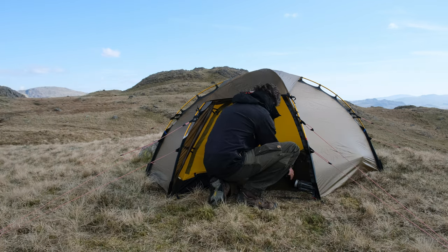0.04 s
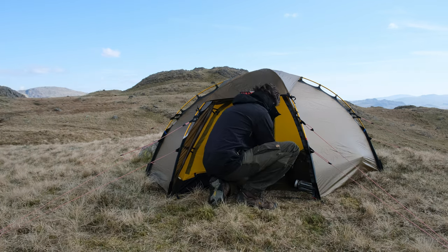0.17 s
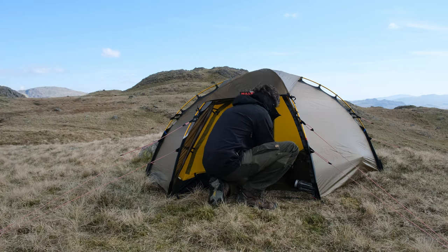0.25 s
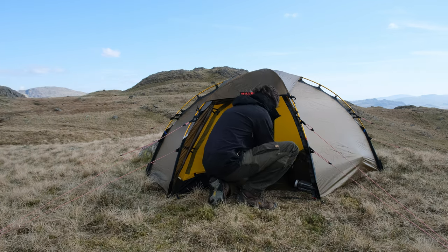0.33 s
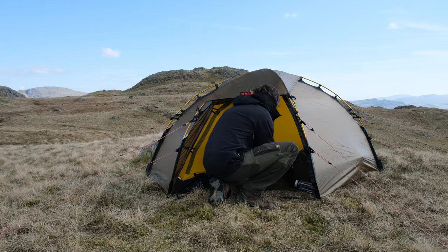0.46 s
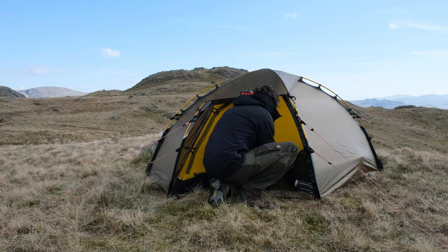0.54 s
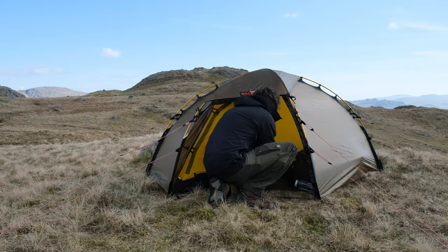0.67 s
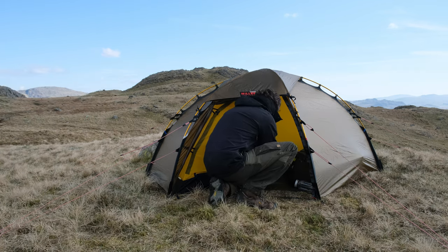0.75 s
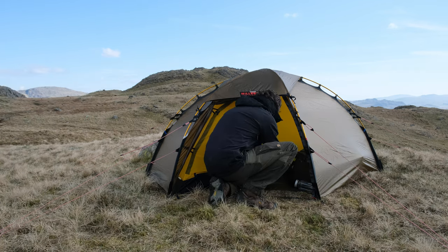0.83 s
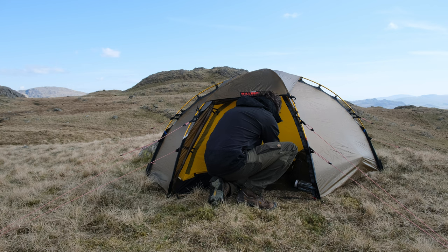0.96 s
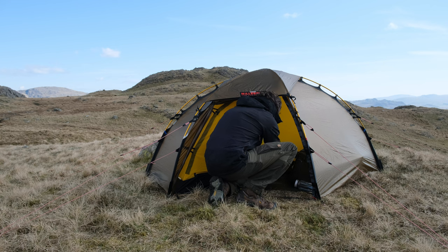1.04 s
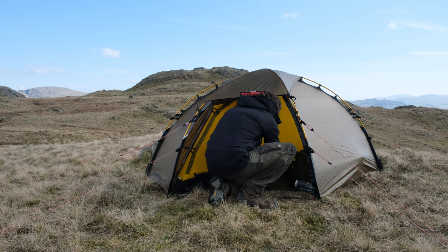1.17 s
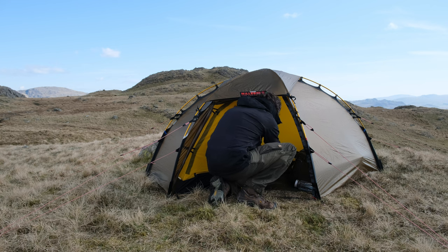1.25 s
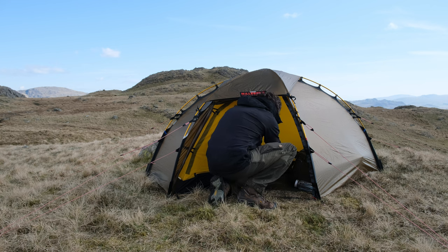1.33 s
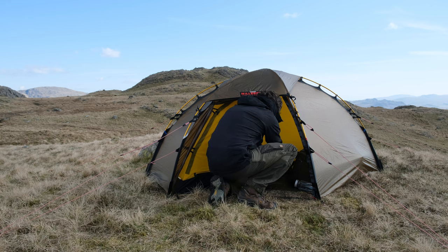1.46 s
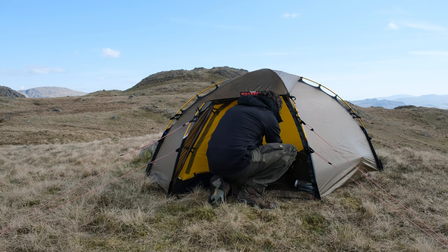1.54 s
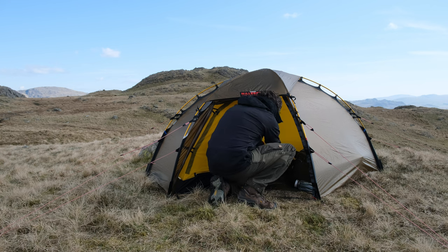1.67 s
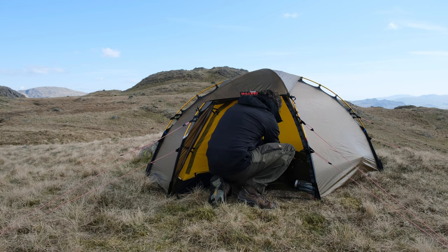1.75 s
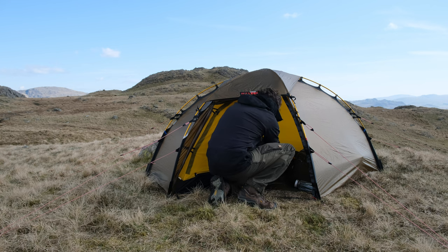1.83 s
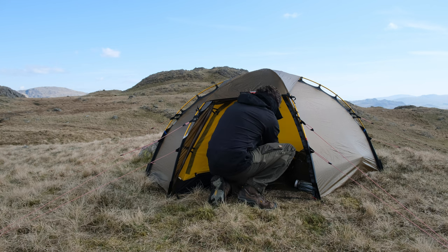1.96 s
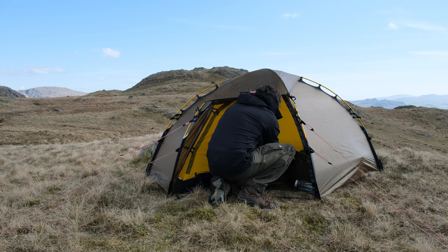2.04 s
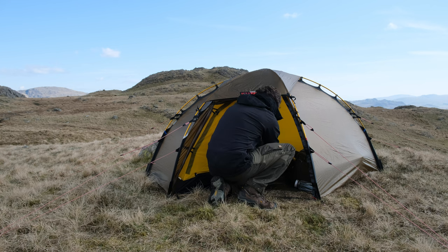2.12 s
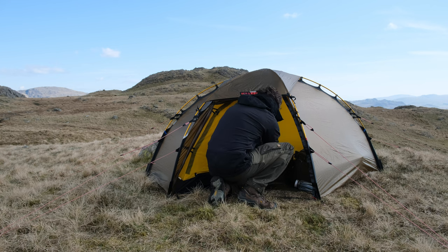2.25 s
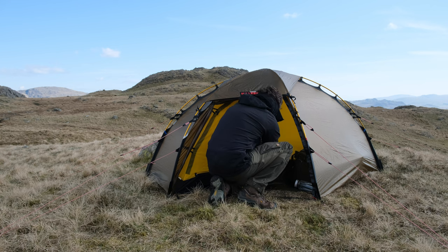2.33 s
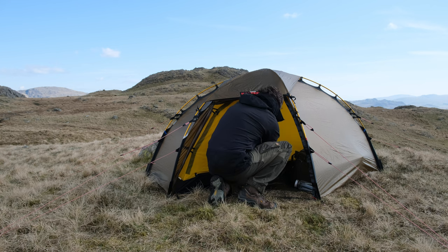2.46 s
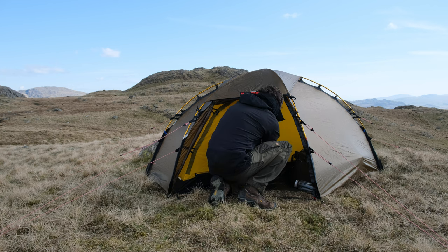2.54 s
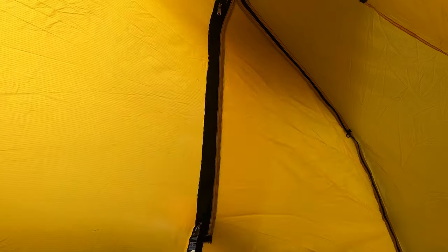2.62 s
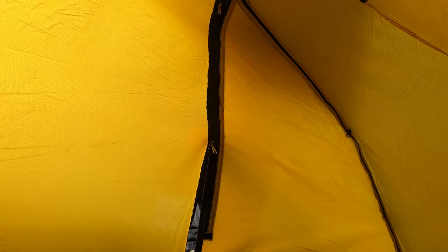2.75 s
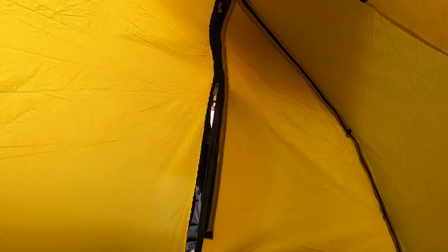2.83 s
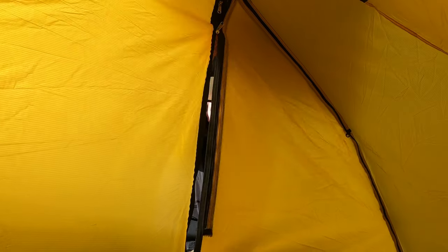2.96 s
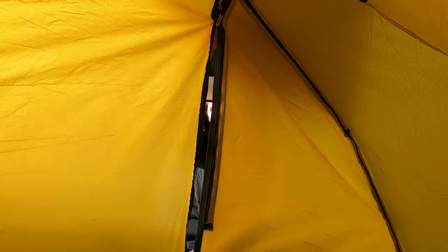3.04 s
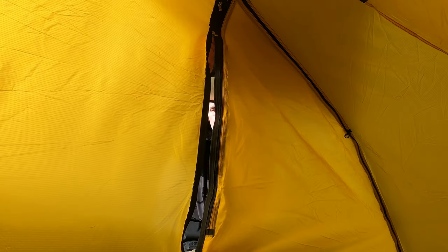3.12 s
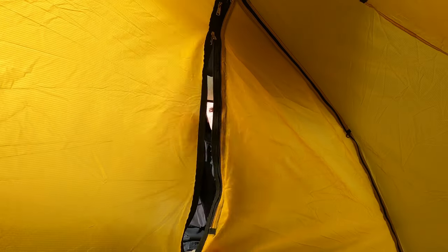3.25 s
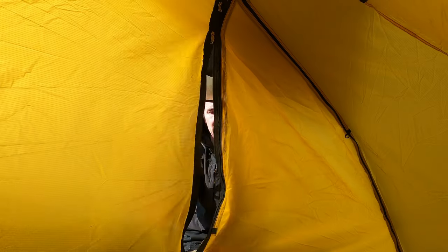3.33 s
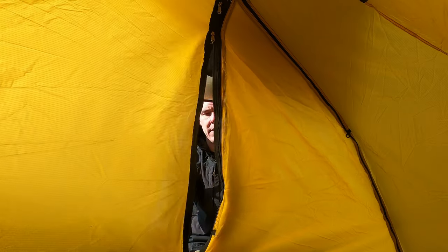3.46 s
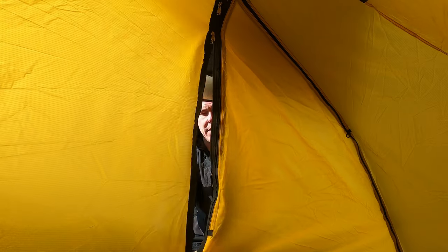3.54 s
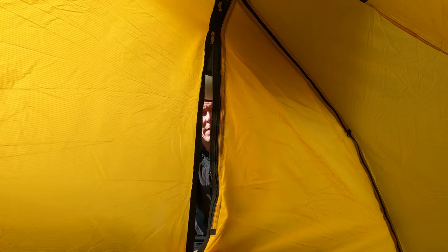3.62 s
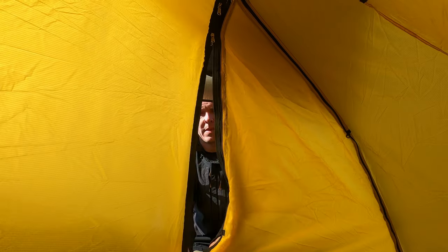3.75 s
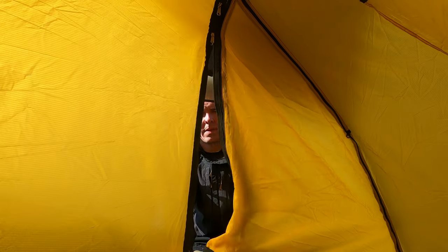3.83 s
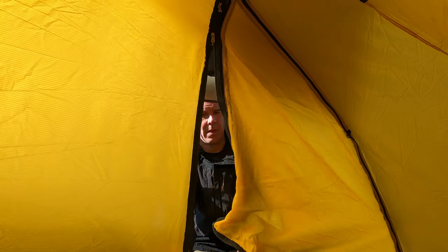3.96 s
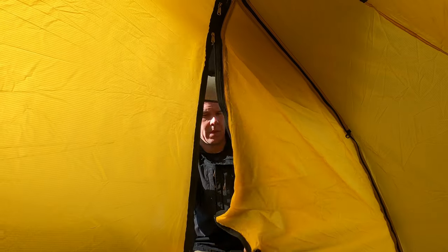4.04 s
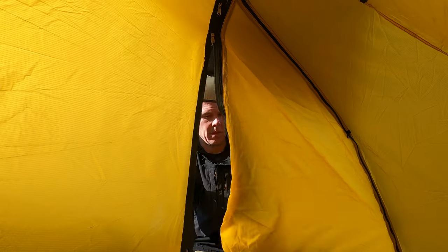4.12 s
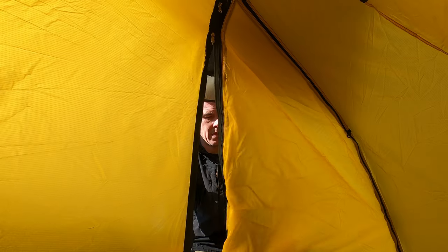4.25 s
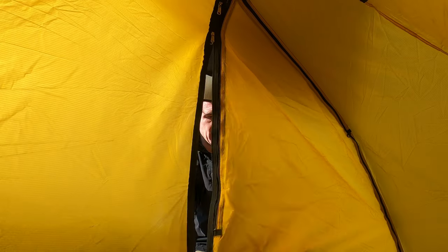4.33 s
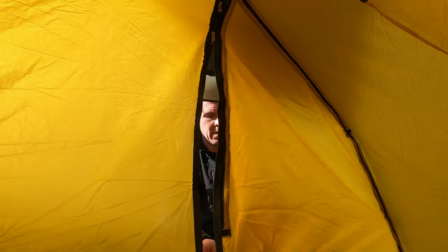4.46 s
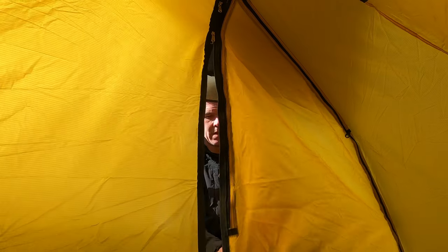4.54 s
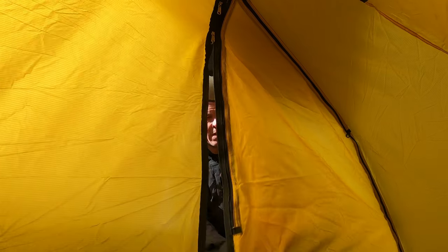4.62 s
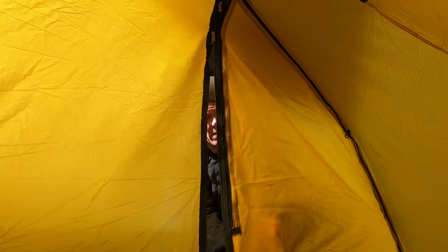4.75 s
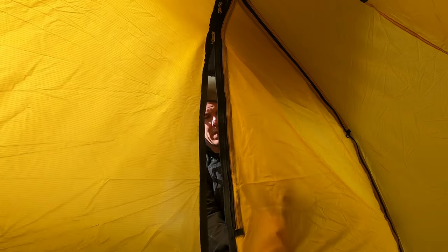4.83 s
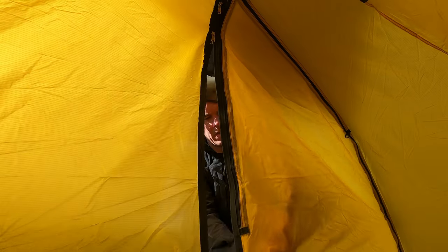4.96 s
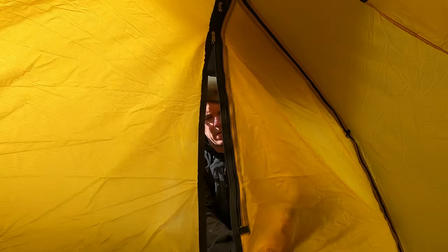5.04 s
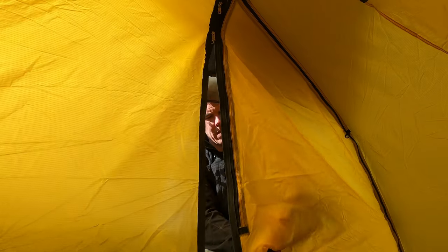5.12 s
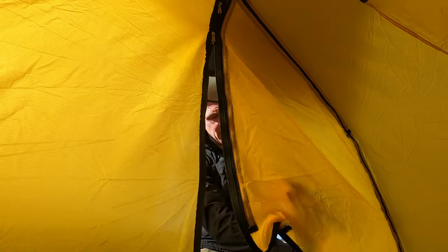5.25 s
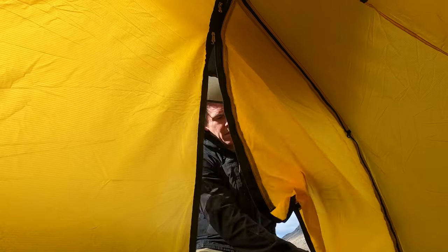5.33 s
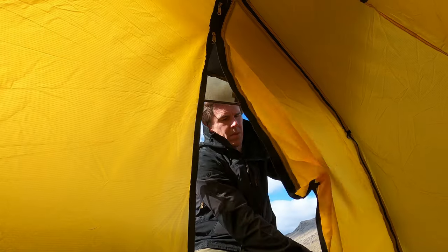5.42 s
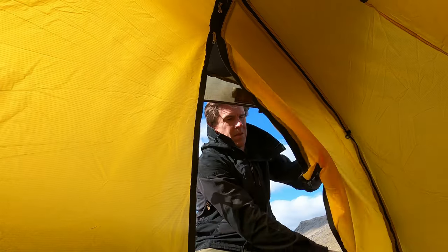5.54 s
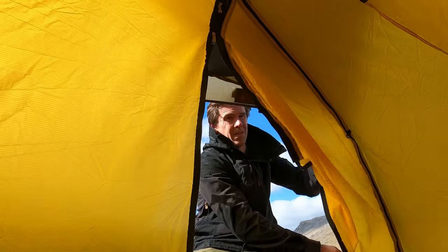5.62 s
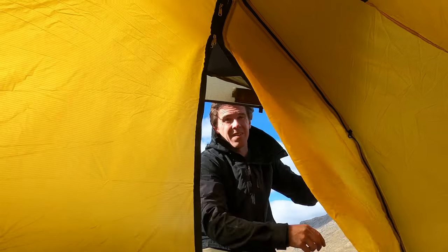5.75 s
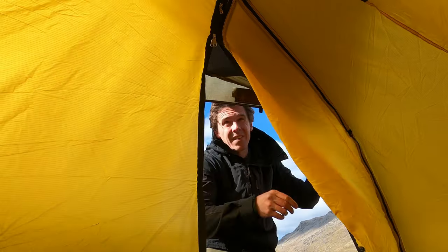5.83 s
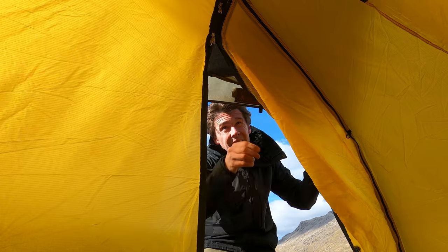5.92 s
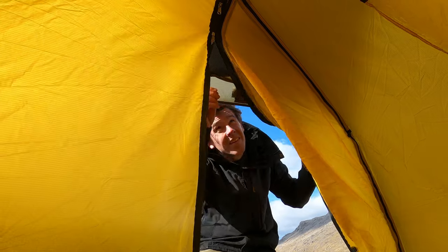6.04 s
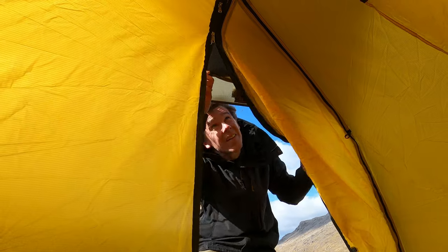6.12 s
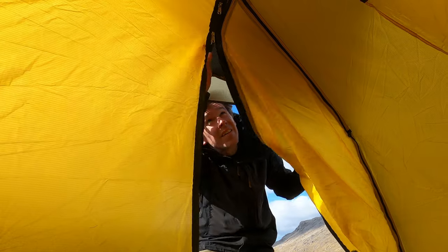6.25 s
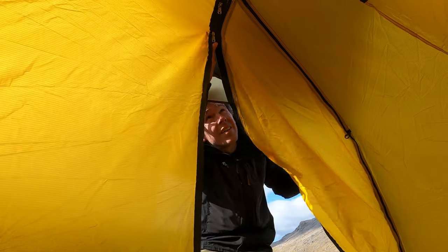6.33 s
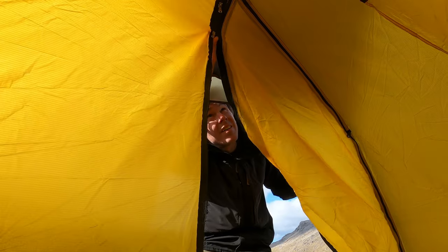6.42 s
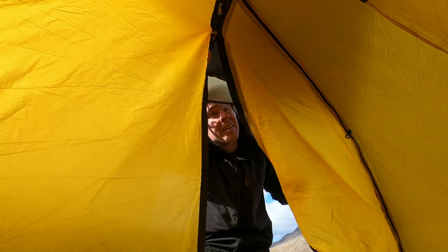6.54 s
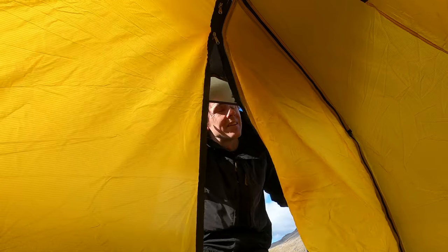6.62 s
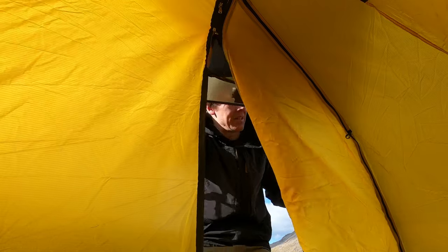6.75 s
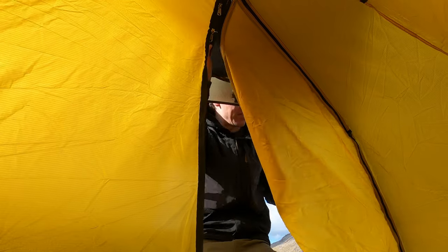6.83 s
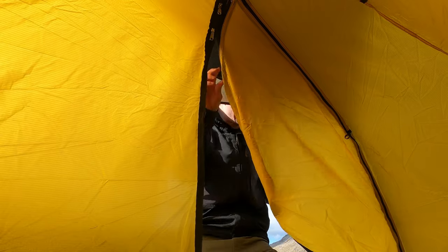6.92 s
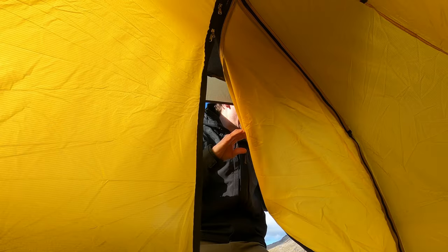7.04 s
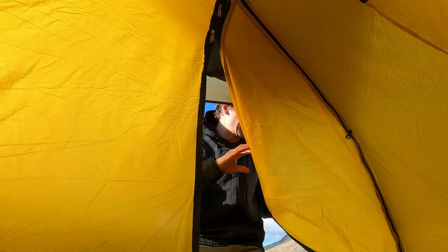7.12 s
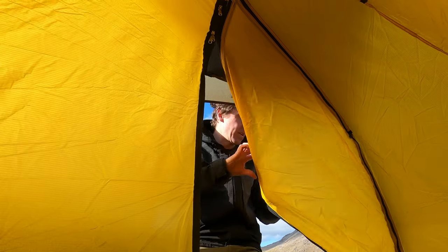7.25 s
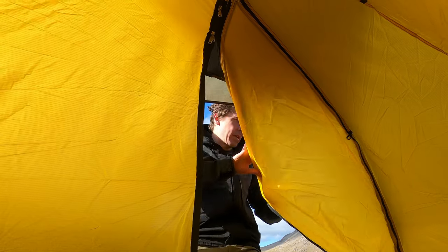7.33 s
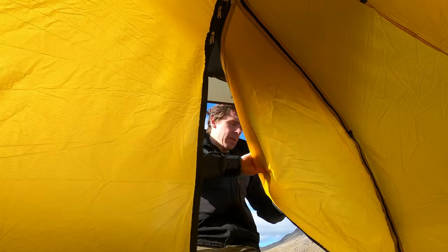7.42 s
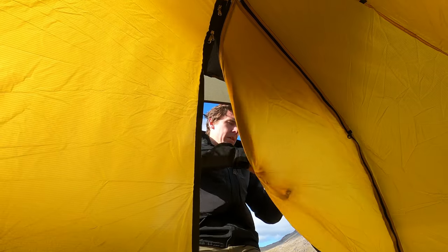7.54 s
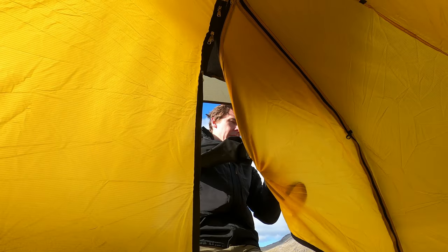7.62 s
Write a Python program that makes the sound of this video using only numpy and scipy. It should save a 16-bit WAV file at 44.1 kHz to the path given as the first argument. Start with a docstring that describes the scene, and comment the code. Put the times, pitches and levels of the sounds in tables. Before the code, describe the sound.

From 0 to 2.5 s, a light breeze buffets the microphone on an open hillside, with thin grass hiss, soft nylon rubbing, sparse dry crackles underfoot and faint tab jingles and creases ticking. Around 2.5 s a zipper slider nudges, then sweeps quickly until 3.1 s, its buzz climbing bright and slowing; the sound moves inside the tent. Tabs jingle and cloth rubs. From 3.75 to 4.1 s a lower, coarser zip growls, ending in a loud fabric snap, low flap and metallic jingle near 4.15 s. Crinkles and ticks continue until a third fast rasp from 5.05 to 5.6 s, rising early then dropping. Cloth swishes and folds afterward; a short, weak, slow tug comes at 6.7 s, with a soft panel thump near 6.9 s. Rustling nylon and gentle wind remain to the end, close and slightly right, with tiny bright wall echoes.

```python
"""Light wind and rubbing nylon open on a hillside; boots crackle in dry grass, pull tabs jingle, creases tick.
At 2.5 s a nudge of the zip slider leads into a quick sweep, and the sound passes to inside the tent.
Two more sweeps and, at 6.7 s, a short tug follow; tooth rate sets the pitch, taut cloth brightens the rasp.
Between sweeps cloth rubs, snaps, flaps and folds; random echoes from the tent walls scatter the treble."""
import sys
import numpy as np
from scipy import signal
from scipy.fft import rfft, irfft
from scipy.io import wavfile

SR = 44100
rng = np.random.default_rng(int(sys.argv[2]) if len(sys.argv) > 2 else 0)


def put_to_file(sound):
    """Save the sound as 16-bit audio at rate SR, in the file named by the first command-line argument."""
    columns = np.atleast_2d(sound).T  # one column per channel
    safe = np.clip(columns, -1, 1)
    whole_steps = np.round(safe * 32767)
    wavfile.write(sys.argv[1], SR, whole_steps.astype(np.int16))


N = 338688
T = np.arange(N) / SR
FREQ = np.maximum(np.arange(N // 2 + 1) * SR / N, 1)
TOP_HZ = 15050
# 0 on the hillside, 1 inside the tent
INSIDE = np.clip((T - 2.55) / .1, 0, 1)


def undb(db):
    """Decibels to amplitude ratio."""
    return 10 ** (np.asarray(db) / 20)


def noise():
    """White noise at unit level."""
    return rng.standard_normal(N)


def unit(x):
    """Scale to an rms of 1."""
    return x / np.sqrt(np.mean(x ** 2))


def walk(rate_hz):
    """Smooth random motion with a spread near 1."""
    return unit(irfft(rfft(noise()) / (1 + (FREQ / rate_hz) ** 2), N))


def curves(table):
    """A table's columns at every sample."""
    s, *columns = np.transpose(table)
    return [np.interp(T, s, c) for c in columns]


def during(table, fade_s=.012):
    """1 over the table's span, with soft edges."""
    start_s, end_s = table[0][0], table[-1][0]
    return np.clip(np.minimum(T - start_s, end_s - T) / fade_s + 1, 0, 1)


def colour(x, points, band_hz=None):
    """Causal filter through (Hz, dB) points; unit white noise comes out at unit level within the band."""
    hz, db = np.transpose(points)
    gain = undb(np.interp(np.log(FREQ), np.log(hz), db))
    in_band = 1 if band_hz is None else (FREQ > band_hz[0]) & (FREQ < band_hz[1])
    level = np.sqrt(np.mean(gain ** 2 * in_band))
    # minimum phase by folding the cepstrum
    cepstrum = irfft(np.log(gain / level), N)
    cepstrum[1:N // 2] *= 2
    cepstrum[N // 2 + 1:] = 0
    return irfft(rfft(x) * np.exp(rfft(cepstrum)), N)


def grains(rate_per_s, spread_db):
    """Random impulses of uneven size and sign."""
    hits = rng.random(N) < rate_per_s / SR
    return hits * rng.choice([-1, 1], N) * undb(spread_db * np.clip(noise(), -2, 2))


def add(track, s, x):
    """Mix x into the track at time s."""
    i = int(s * SR)
    track[i:i + len(x)] += x[:N - i]


def band_pass(x, hz, width_hz):
    """One resonance, gain 1 at its centre."""
    return signal.lfilter(*signal.iirpeak(hz, hz / width_hz, fs=SR), x)


def gusting():
    """Relative strength of the wind in dB: bell-shaped gusts over a light breeze."""
    # gusts: (peak time [s], level [dB])
    gust_peaks = [(1.03, -44.5), (1.52, -44), (1.87, -45.5), (2.92, -42), (3.8, -40), (4.201, -45),
                  (5.88, -42.5), (7.0, -43)]
    swell_s, breeze_db = 0.12, -55
    power = undb(breeze_db) ** 2
    for s, db in gust_peaks:
        bell = np.exp(-((T - s) / swell_s) ** 2 / 2)
        power = power + (undb(db) * bell) ** 2
    return 10 * np.log10(power)


def wind(buffet_db=-8.5, hiss_db=-64, shelter_db=-6, side_db=-9):
    """Gusts buffet the microphone; the grass hisses, softer after 2.6 s, its treble rolled off above 9 kHz."""
    # buffeting spectrum: (frequency [Hz], level [dB])
    buffet_colour = [(30, 7), (100, -4), (200, -17), (500, -48)]
    # grass hiss spectrum: (frequency [Hz], level [dB])
    hiss_colour = [(200, 5), (1100, -2), (2400, -16.5), (8400, -10), (15000, -13)]
    sides = np.array([[1], [-1]])
    # the ears' buffets differ only inside
    side_buffet = undb(side_db) * INSIDE * sides * colour(noise(), buffet_colour)
    buffet = colour(noise(), buffet_colour) + side_buffet
    buffet = buffet * undb(gusting() + buffet_db + 2 * walk(34.0))
    hiss = colour(noise(), hiss_colour) + 0.07 * sides * colour(noise(), hiss_colour)
    rolled_off = signal.sosfilt(signal.butter(2, 9000, fs=SR, output="sos"), hiss)
    hiss = hiss + INSIDE * (rolled_off - hiss)
    return buffet + hiss * undb(hiss_db + shelter_db * INSIDE + walk(2.9))


def rubbing():
    """Relative level of the cloth's friction in dB: each rub has an attack, a sagging hold and a release."""
    # moves of the hand or door: (start [s], length [s], level [dB])
    rubs = [(0, 0.16, -61), (1.72, 0.16, -61), (2.27, 0.39, -60.5), (3.047, 0.13, -53), (3.164, 0.062, -47),
            (3.22, 0.35, -58), (3.584, 0.3, -53.5), (4.056, 0.034, -47.5), (4.127, 0.021, -36.5),
            (4.216, 0.038, -43.5), (4.305, 0.11, -54), (4.668, 0.3, -53), (5.554, 0.27, -50),
            (5.824, 0.59, -60), (6.247, 0.12, -51.5), (6.413, 1.3, -61), (6.655, 0.08, -51.5),
            (6.725, 0.32, -46.5), (7.046, 3, -52.5), (7.479, 0.16, -42)]
    attack_s, sag_db, release_s, resting_db = 0.036, 1, 0.042, -66
    power = undb(resting_db) ** 2
    for start_s, length_s, db in rubs:
        attack = np.clip((T - start_s) / attack_s, 0, 1)
        hold = undb(db - sag_db * np.clip((T - start_s) / length_s, 0, 1))
        release = np.exp(-np.maximum(T - start_s - length_s, 0) / release_s)
        power = power + (attack * hold * release) ** 2
    return 10 * np.log10(power)


def nylon(swish_db=-2.5, crinkle_db=-7.0, crinkle_s=0.00079, flutter_db=-26, flutter_slope=0.64, grip_db=1.16):
    """Cloth slides in uneven grips: a swish of threads, small crinkles and the flutter of the panel."""
    # spectrum of sliding threads: (frequency [Hz], level [dB])
    swish_colour = [(300, -2.5), (750, -8.5), (1300, 0), (2300, -1), (5500, -7.5), (9000, -16),
                    (15000, -34)]
    # spectrum of the fluttering panel: (frequency [Hz], level [dB])
    flutter_colour = [(60, -21.5), (150, 4), (330, -4), (1000, -34.5)]
    rub_db = rubbing()
    # each crinkle is a short crunch that dies away
    decay = np.exp(-T[:SR // 50] / crinkle_s)
    crinkles = signal.fftconvolve(np.abs(grains(220, 5.5)), decay)[:N] * noise()
    threads = undb(swish_db) * noise() + undb(crinkle_db) * unit(crinkles)
    swish = colour(threads * undb(rub_db + grip_db * walk(37)), swish_colour, (1000, 9000))
    # out on the hillside, dry grass crackles under the boots
    grass = (1 - INSIDE) * grains(12, 3) * undb(-46)
    # flutter grows more slowly than the rubbing and is heard only from inside
    flutter_level = undb(flutter_slope * rub_db + flutter_db + 2 * walk(26))
    flutter = INSIDE * colour(noise(), flutter_colour) * flutter_level
    return swish + grass + flutter


def tabs(knocks, jingle_db=-30, rattle_s=0.024, contact_db=-3):
    """Metal pull tabs chatter together, a bright scratch of contacts and their ring; slider knocks ring too."""
    # jingles: (time [s], level [dB])
    jingles = [(0.674, -49), (1.629, -48), (2.098, -50), (3.032, -32), (3.508, -38), (3.586, -36),
               (4.142, -32), (4.351, -36), (4.7027, -52), (4.813, -48), (4.8587, -42), (5.048, -43),
               (5.718, -43.5), (6.7515, -38.5)]
    # ringing modes of a tab: (frequency [Hz], level [dB], 60 dB decay time [s])
    tab_modes = [(5965, 0, .06), (8130, -8, .025), (8480, -7, .035), (10600, -13, .02), (14300, -16, .07)]
    shaking, t = np.zeros(N), T[:SR // 4]
    for s, db in jingles:
        add(shaking, s, undb(db) * np.exp(-(t / rattle_s) ** 2))
    ears = []
    for _ in range(2):
        chatter = shaking * unit(grains(2500, 3))
        ring = np.zeros(len(t))
        for hz, db, t60_s in tab_modes:
            ring += undb(db - 60 * t / t60_s) * np.sin(2 * np.pi * (hz * t + rng.random() / 2))
        ringing = signal.fftconvolve(undb(jingle_db) * chatter + knocks, ring)[:N]
        ears.append(ringing + undb(contact_db) * band_pass(chatter, 6400, 3000))
    return np.array(ears)


def ticks(crack_db=-11, crack_s=0.00025, tail_db=-24, tail_s=0.0094, split_hz=4000):
    """A crease in the nylon flips with a crack, and the cloth round it shivers."""
    # snapping creases: (time [s], level [dB], treble gain [dB])
    creases = [(1.631, -29, 4), (2.409, -25, -0.5), (2.535, -28.5, 8), (3.584, -21.5, 10.5),
               (3.642, -30, 16), (4.142, -9.5, 2), (4.496, -24, 18.5), (4.972, -23, 8), (5.815, -24.5, 7),
               (5.996, -25, 5.5), (6.233, -27, 9), (6.608, -44, 28.5)]
    # spectrum of a snap: (frequency [Hz], level [dB])
    snap_colour = [(100, 23), (700, 8), (1100, 13.5), (2500, 4), (9000, -7.5), (15000, -34)]
    low_pass = signal.butter(2, split_hz, fs=SR, output="sos")
    high_pass = signal.butter(2, split_hz, "high", fs=SR, output="sos")
    track, t = np.zeros(N), T[:SR // 12]
    envelope = undb(crack_db) * np.exp(-t / crack_s) + undb(tail_db) * np.exp(-t / tail_s)
    for s, db, treble_db in creases:
        burst = rng.standard_normal(len(t)) * envelope
        burst[0] = 1
        dull = signal.sosfilt(low_pass, burst)
        sharp = signal.sosfilt(high_pass, burst)
        # second-order halves meet in phase when subtracted
        add(track, s, undb(db) * (dull - undb(treble_db) * sharp))
    return colour(track, snap_colour)


def along(place):
    """A random property of the zip, new at every whole step of place and interpolated between."""
    values = rng.standard_normal(int(place[-1]) + 2)
    return np.interp(place, np.arange(len(values)), values)


def stroke(table, jitter, scrape_db, growl_db, tab_db, edge_hz, wobble=.014, uneven_db=1.08):
    """One pull of the slider: returns the tape's hum, tooth clicks, scrape, fabric growl and knocks on the tab."""
    # taut tape resonating under the slider: (time [s], frequency [Hz], level [dB])
    surges = [(2.765, 1900, 9.5), (2.835, 4420, 9.5), (2.918, 3360, 8.5), (5.258, 2470, 9.5),
              (5.44, 2150, 12)]
    surge_s, surge_width_hz = 0.04, 154
    smooth_hz, taut_hz = 1000, 1130  # tooth rates of a smooth pull and of a fully taut door
    bending_hz = 70  # the tape is one bending wavelength long here
    node_teeth, steady_below_hz = 12, 3000
    hz, hum_db, rasp_db = curves(table)
    gate = during(table)
    on = gate > 0
    # the slider's place in teeth; the slower it goes, the more unevenly the teeth let go
    teeth = np.cumsum((hz * (1 + wobble * walk(60)))[on]) / SR
    slow = np.sqrt(smooth_hz / hz[on])
    place = teeth + jitter * slow * along(teeth)
    force = undb(uneven_db * slow * along(teeth))

    def partial(k):
        """k times the tooth rate; it fades across the panel's nodes and surges where the tape resonates."""
        partial_hz = k * hz[on]
        steady = np.sqrt(steady_below_hz / partial_hz)
        drift = along(teeth / node_teeth) + 1j * along(teeth / node_teeth)
        fading = (steady + drift) / np.sqrt(steady ** 2 + 1)
        surge = 0
        for s, centre_hz, db in surges:
            if table[0][0] < s < table[-1][0]:
                off_time = (T[on] - s) / surge_s
                off_pitch = (partial_hz - centre_hz) / surge_width_hz
                surge = surge + undb(db) * np.exp(-off_time ** 2 - off_pitch ** 2)
        # bending waves smear each click, treble first
        cycles = k * place - np.sqrt(partial_hz / bending_hz)
        return np.real((fading + surge) * np.exp(2j * np.pi * cycles)) * (partial_hz < TOP_HZ)

    hum, clicks, scrape = np.zeros((3, N))
    # each tooth tugs the tape, which drives the fabric like a drum skin
    hum[on] = np.sqrt(2) * undb(hum_db[on]) * np.sqrt(force) * partial(0.99)
    clicks[on] = 2 * force * np.sqrt(hz[on] / SR) * sum(partial(k) for k in range(2, 40))
    # the slider scrapes hardest just as a tooth lets go
    scrape[on] = unit(force * np.exp(-(place % 1)) * noise()[on])
    # a slack door softens every tooth's edge, until the pull draws it taut
    rasp = np.array([clicks, scrape * undb(scrape_db)]) * undb(rasp_db)
    soft = signal.sosfilt(signal.butter(1, edge_hz, fs=SR, output="sos"), rasp)
    taut = np.clip(hz / taut_hz, 0, 1) ** 2
    rasp = soft + taut * (rasp - soft)
    growl = scrape * undb(hum_db + growl_db)
    knocks = grains(80, 4) * undb(tab_db)
    return gate * np.array([hum, *rasp, growl, knocks])


def zipper():
    """The slider trips over the teeth in every stroke. Returns the sound and the knocks on the tab."""
    # slider strokes: (time [s], tooth rate [Hz], hum level [dB], rasp level [dB])
    nudge = [(2.47, 229, -61, -63), (2.53, 436, -42, -45.5), (2.59, 403, -49, -37)]
    first_sweep = [(2.575, 174.4, -40.5, -47.5), (2.642, 582, -40.5, -34), (2.7, 776, -42.5, -32.5),
                   (2.772, 994, -34.5, -34), (2.805, 1070, -40.5, -32.5), (2.84, 1120, -31.5, -30),
                   (2.876, 1187, -37, -34), (2.918, 1156, -38, -33), (2.95, 1052, -40, -32.5),
                   (3.01, 501, -44, -33.5), (3.085, 98.7, -42, -54.5)]
    second_sweep = [(3.745, 111.5, -47, -57), (3.783, 176, -29.5, -43.5), (3.812, 173.2, -39, -45),
                    (3.85, 264, -27, -39.5), (3.878, 325.6, -37, -37.5), (3.915, 326, -32.5, -37.5),
                    (3.955, 378, -31.5, -35.5), (4.018, 398, -28.5, -34), (4.055, 297, -31.5, -35),
                    (4.088, 140, -41, -44)]
    third_sweep = [(5.065, 150.8, -43, -50.5), (5.116, 435.3, -42, -36.5), (5.145, 598.3, -41.5, -35),
                   (5.235, 905, -52.5, -35), (5.275, 786.6, -45.5, -36), (5.354, 663.6, -39.5, -34.5),
                   (5.405, 479.5, -32.5, -43), (5.43, 390, -30, -39), (5.46, 446.4, -32, -37),
                   (5.542, 314.4, -32.5, -40.5), (5.595, 122.2, -46, -55)]
    last_tug = [(6.712, 98.5, -52, -56), (6.755, 114.9, -47.5, -60), (6.82, 99.2, -56, -61)]
    # spectra of a tooth click and of the slider's scrape: (frequency [Hz], level [dB])
    click_colour = [(300, 25), (850, 3.5), (1250, 12.5), (3500, 5), (5000, 0.5), (8000, -14), (15000, -58)]
    scrape_colour = [(150, -1.5), (350, -10.5), (750, -1.5), (1250, -1.5), (3000, 6), (5000, -0.5),
                     (8500, -0.5), (15000, -15)]
    hum, clicks, scrape, growl, knocks = (
        stroke(nudge, scrape_db=-10, growl_db=-16, jitter=0.04, tab_db=-61, edge_hz=1100)
        + stroke(first_sweep, scrape_db=-7, growl_db=-18, jitter=0.021, tab_db=-53, edge_hz=4200)
        + stroke(second_sweep, scrape_db=0, growl_db=-15, jitter=0.052, tab_db=-45, edge_hz=2900)
        + stroke(third_sweep, scrape_db=-9, growl_db=-15, jitter=0.016, tab_db=-48.5, edge_hz=3000)
        + stroke(last_tug, scrape_db=-20, growl_db=3, jitter=0.057, tab_db=-49, edge_hz=2600))
    band_hz = (1300, 7000)
    # loose fabric beside the slider is shaken by the scrape
    growl = colour(growl, [(70, -8.5), (170, 8), (330, 2), (600, 4.5), (1500, -28.5)])
    rasp = colour(clicks, click_colour, band_hz) + colour(scrape, scrape_colour, band_hz)
    return hum + growl + rasp, knocks


def flaps():
    """A slack panel snaps taut and shoves the air: a brief low pulse under a bell-shaped envelope."""
    # panels pulled taut: (time [s], frequency [Hz], peak level [dB], time from peak to 1/e [s])
    panels = [(3.079, 67.85, -35, 0.016), (4.153, 41.6, -27.5, 0.011), (4.183, 152, -28.5, 0.0015),
              (6.886, 135, -27.5, 0.0043)]
    track = np.zeros(N)
    for s, hz, db, length_s in panels:
        bell = np.exp(-((T - s) / length_s) ** 2)
        track += undb(db) * np.cos(2 * np.pi * hz * (T - s)) * bell
    return track


def folds(swell_s=0.0012, width_share=.7):
    """A fold of cloth buckles over a few milliseconds: a soft crunch of band-passed noise."""
    # buckling folds: (time [s], peak rms level [dB], centre frequency [Hz])
    buckles = [(3.148, -45.5, 1563), (4.073, -26, 716), (4.15, -36, 1110), (4.173, -40.5, 596),
               (4.211, -38.5, 1690), (4.693, -41.5, 1650), (5.029, -42, 1250), (5.788, -43.5, 2200),
               (6.285, -47, 2500), (6.421, -40, 2670), (6.852, -39.5, 1080), (6.88, -33.5, 325),
               (6.938, -36, 2200), (7.059, -42, 1570)]
    track, t = np.zeros(N), T[:SR // 20]
    envelope = t / swell_s * np.exp(1 - t / swell_s)
    for s, db, hz in buckles:
        crunch = unit(band_pass(rng.standard_normal(len(t)), hz, hz * width_share))
        add(track, s, undb(db) * crunch * envelope)
    return track


def tent(x, lag_s=.000025, decay_s=0.0052, scatter_hz=4800, echo_db=5.5, billow_hz=12, count=4):
    """The left ear lags slightly; the walls billow, so their brief, bright echoes shift at each ear."""
    t, spectrum = T[:SR // 40], rfft(x)
    # the shorter the wave, the more of it comes by way of the walls
    share = .1 + .8 * FREQ / np.hypot(FREQ, scatter_hz)
    direct = spectrum * np.sqrt(1 - share ** 2)
    ears = []
    for ear_lag_s in (lag_s, 0):
        ear = irfft(direct * np.exp(-2j * np.pi * FREQ * ear_lag_s), N)
        for _ in range(count):
            echoes = rng.standard_normal(len(t)) * np.exp(-t / decay_s)
            echoes /= np.linalg.norm(echoes)
            billow = np.tanh(walk(billow_hz)) * undb(echo_db) / np.sqrt(count)
            ear += irfft(spectrum * share * rfft(echoes, N), N) * billow
        ears.append(ear)
    return np.array(ears)


def scene():
    """The door sounds slightly to the right; the wind is added without the tent's echoes."""
    zip_sound, knocks = zipper()
    cloth = ticks() + folds() + nylon() + flaps()
    door = tent(zip_sound + cloth) + tabs(knocks)
    ears_db = [[-.3], [.3]]
    return door * undb(ears_db) + wind()


def record(dry):
    """The recorder cuts the top with a steep low-pass."""
    return signal.sosfilt(signal.ellip(8, .2, 70, TOP_HZ, fs=SR, output="sos"), dry)


dry = scene()
out = record(dry)
put_to_file(out)
```